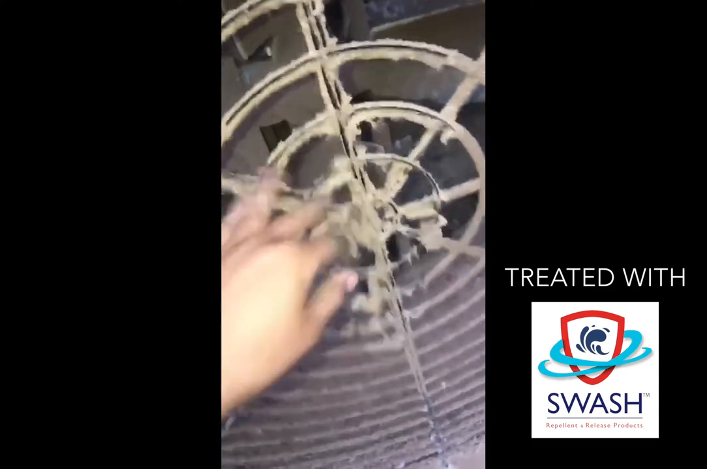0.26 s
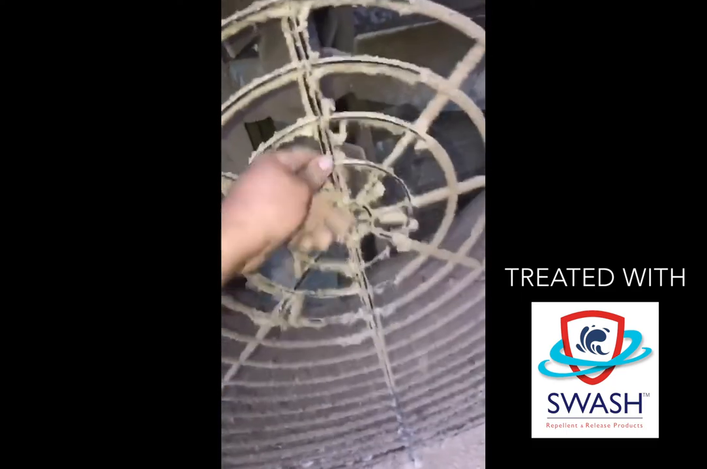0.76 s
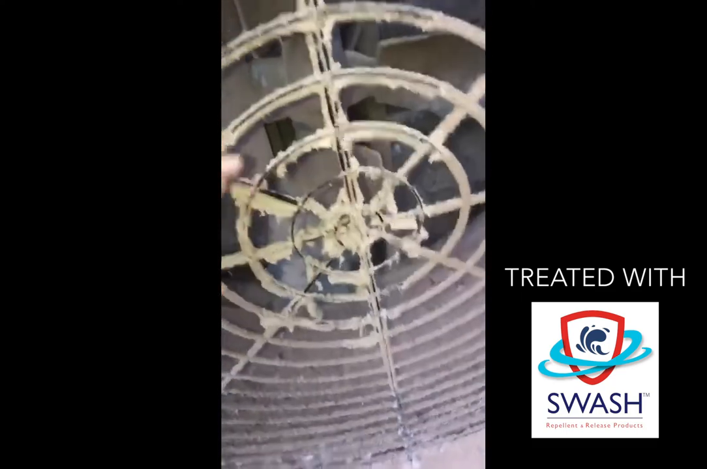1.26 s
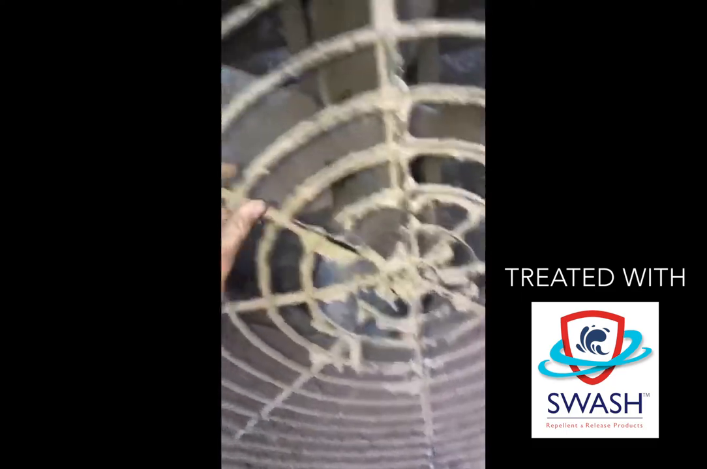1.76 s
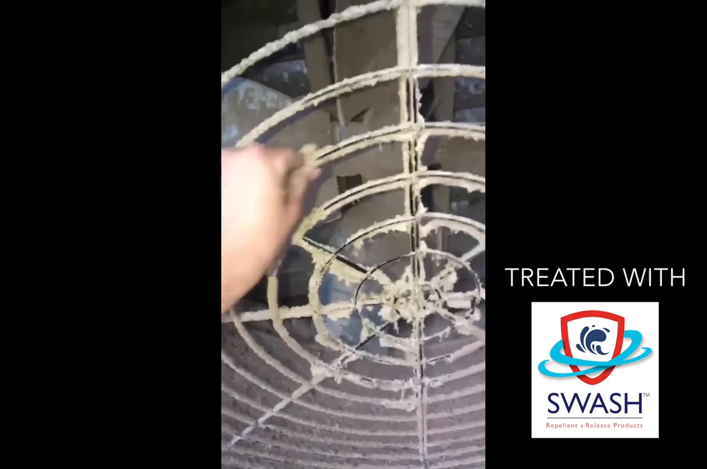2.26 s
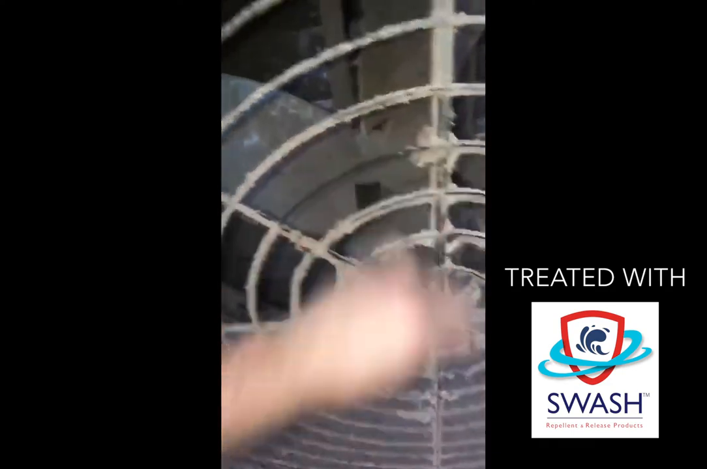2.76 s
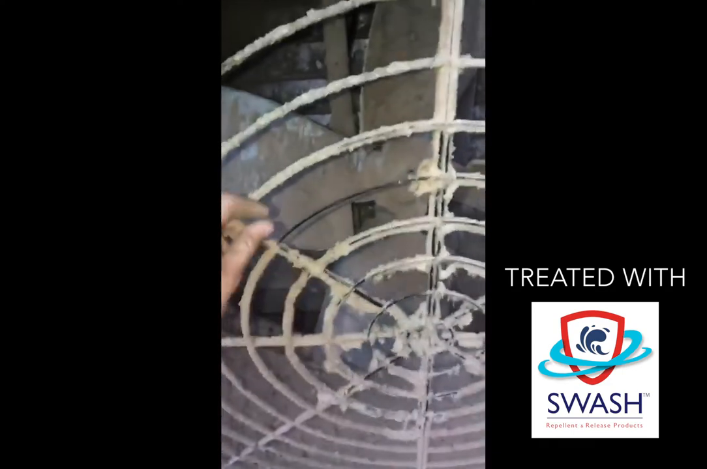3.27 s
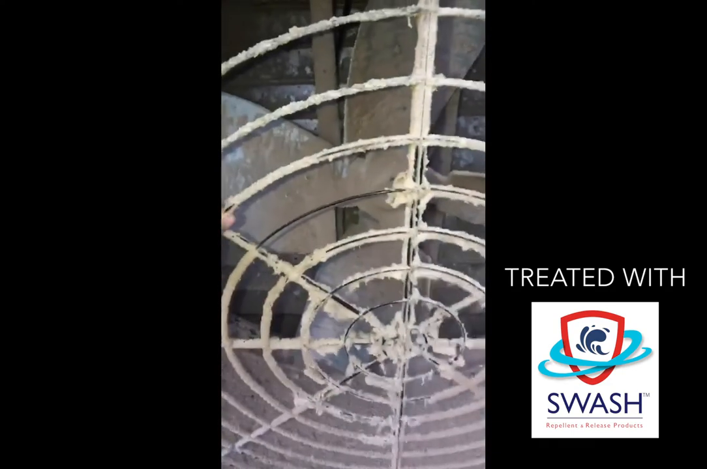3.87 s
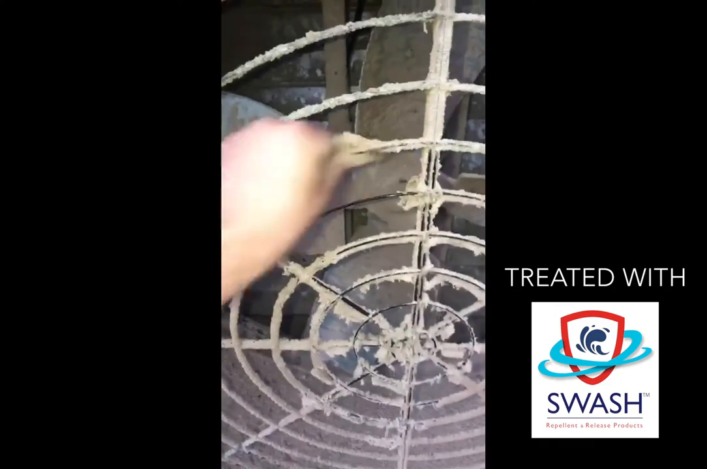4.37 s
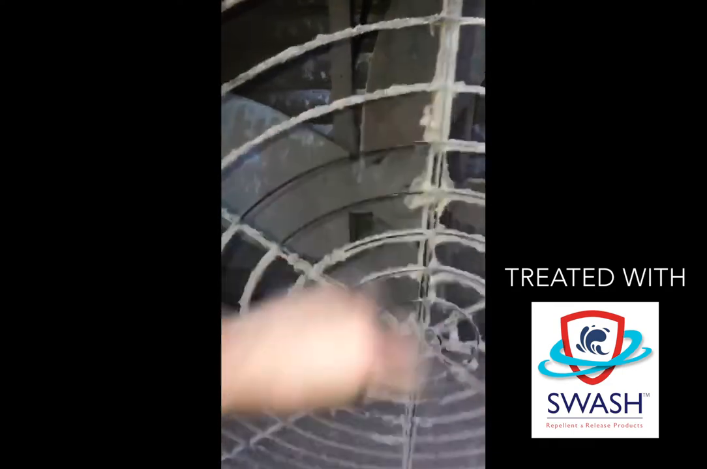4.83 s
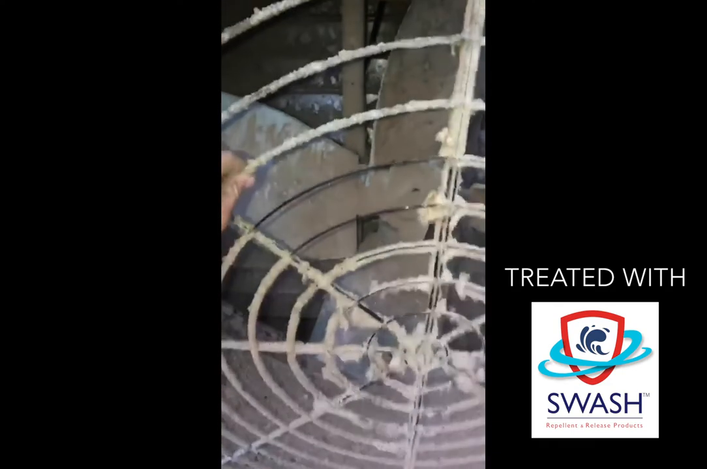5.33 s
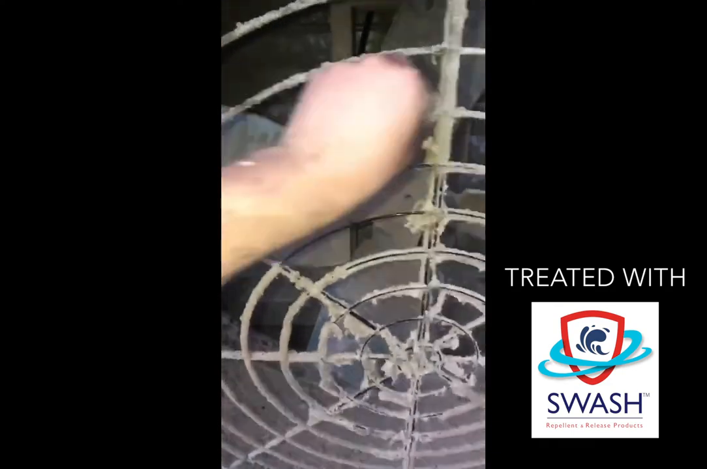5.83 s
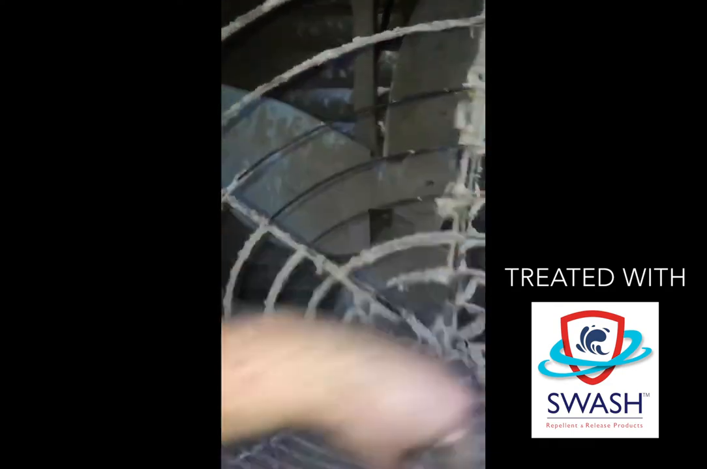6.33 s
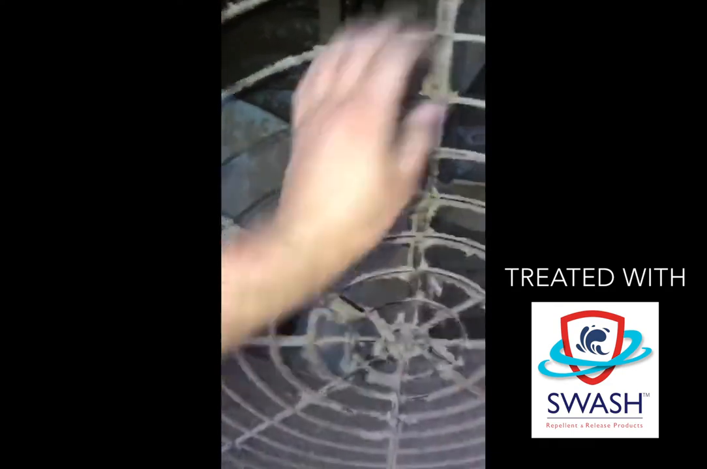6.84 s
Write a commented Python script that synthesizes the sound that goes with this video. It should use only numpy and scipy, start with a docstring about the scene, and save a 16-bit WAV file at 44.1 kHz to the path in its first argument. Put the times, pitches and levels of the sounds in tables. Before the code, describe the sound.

Large exhaust fans rumble and hum steadily in a livestock shed while crickets trill thinly above and a hand rubs gritty dust off a wire guard.

```python
"""In a livestock shed two large exhaust fans run: slowly beating blade harmonics, motor hum and shaped noise for air.
Crickets whine above them in short falling notes with a blurred ring, among a very high hiss and rising squeaks.
A hand rubs caked dust off the wire guard of an idle fan: coloured random grains swell and fade, with one tick.
The sound fades to silence for an instant, and again for good just before the end."""
import sys
import numpy as np
from scipy import signal
from scipy.fft import rfft, irfft, next_fast_len
from scipy.io import wavfile
from scipy.ndimage import uniform_filter1d

SR = 44100
rng = np.random.default_rng(int(sys.argv[2]) if len(sys.argv) > 2 else 0)


def to_wav(s):
    """Save 16-bit WAV."""
    ch = np.atleast_2d(s).T  # columns
    pcm = np.round(np.clip(ch, -1, 1) * 32767)  # PCM
    wavfile.write(sys.argv[1], SR, pcm.astype(np.int16))


N = 313110
TIME = np.arange(N) / SR


def from_db(db):
    """Decibels to amplitude gain."""
    return 10 ** (np.asarray(db) / 20)


def rms_one(x):
    """Scale to unit power."""
    return x / np.sqrt(np.mean(x ** 2) + 1e-20)


def in_time(rows):
    """Draw each column as a curve over time, its points joined by straight lines."""
    seconds, *columns = np.transpose(rows)
    return [np.interp(TIME, seconds, column) for column in columns]


def swells(rows):
    """An envelope of bell-shaped swells, their powers summed; half length is where power falls to 1/e."""
    power = 0
    for middle, half_s, level_db in rows:
        bell = np.exp(-((TIME - middle) / half_s) ** 2)
        power = power + from_db(level_db) ** 2 * bell
    return np.sqrt(power)


def drift(rate):
    """Smoothed random motion with rms 1, low-passed with two equal poles at about rate in Hz."""
    step = 40  # drawn at every 40th sample, then joined by lines
    settle = 2000  # start-up steps thrown away
    pole = np.exp(-2 * np.pi * rate * step / SR)
    steps = rng.standard_normal(N // step + settle + 2)
    slow = signal.lfilter([1], [1, -2 * pole, pole * pole], steps)[settle:]
    return np.interp(np.arange(N) / step, np.arange(len(slow)), rms_one(slow))


def coloured(x, spectrum):
    """Filter by a curve of dB over log frequency, then scale to unit power, so only its shape counts."""
    hz, level_db = np.transpose(spectrum)
    size = next_fast_len(N)
    bins = np.maximum(np.fft.rfftfreq(size, 1 / SR), 1)
    gain = from_db(np.interp(np.log(bins), np.log(hz), level_db, left=-60, right=-60))
    return rms_one(irfft(rfft(x, size) * gain, size)[:N])


def air(spectrum):
    """Turbulent noise of a given colour; unit power."""
    return coloured(rng.standard_normal(N), spectrum)


def narrow_noise(hz, width_hz):
    """Noise ringing in one resonance; unit power."""
    r = np.exp(-np.pi * width_hz / SR)
    poles = [1, -2 * r * np.cos(2 * np.pi * hz / SR), r * r]
    return rms_one(signal.lfilter([1, 0, -1], poles, rng.standard_normal(N)))


def tone(hz):
    """A sine of unit power that follows a pitch curve from a random phase."""
    turns = np.cumsum(hz) / SR + rng.random()
    return np.sqrt(2) * np.sin(2 * np.pi * turns)


def glide(from_hz, to_hz, length_s, bend=1):
    """A short swelling and fading note that slides in pitch, faster towards its end if bend exceeds 1."""
    u = np.linspace(0, 1, int(length_s * SR))
    swell = np.sqrt(np.abs(np.sin(np.pi * u)))
    return swell * tone(from_hz + (to_hz - from_hz) * u ** bend)


def add(track, s, sound):
    """Mix a sound in, centred on a time in seconds."""
    at = max(round(s * SR) - len(sound) // 2, 0)
    track[at:at + len(sound)] += sound[:max(N - at, 0)]


def fan(blade_hz, levels_db, slip, offsets, flutter_db, flutter_rate, in_step_s=1.77):
    """Blades pass the struts, giving harmonics; uneven inflow makes each overtone flutter."""
    # Standing waves colour the hum as the microphone moves. Each row: time in seconds,
    # level change in dB on blade harmonics 1, 2, 3, 4, 5, 6, then on all higher ones.
    standing_waves = [(0.0, 0, 1.5, 4, 0, -1, -4, -1.5), (.35, 0, -2, -12, 0.5, -3, -5.5, -0.5),
                      (.8, 0, 0, 1.5, 4, -14, -1.5, 0), (1.35, -.2, 4, -7, 1.5, -12, -0.5, -4),
                      (1.7, -1, 1.5, 0, -2.5, 0, -1.5, -1.5), (2.2, 0.5, -1, -3.5, -9, -3, 2.5, 0),
                      (2.7, 1, -4.5, 2, 1, 3, 1, 0), (3.2, 0, 3.5, .5, -0.5, 2, 2.5, 0.5),
                      (3.75, -2, -13, 4.5, -4, 4, -7, -2), (4.25, -1, -5, 0.5, -1, -2, 1, -3),
                      (4.5, -1.5, -3.5, -12, -6.5, 0, -13, -3), (4.8, -2, -11, 2.5, -1.5, -1, -7, -2),
                      (5.45, 1, -2, -4, 2, 0, 4, 0.5), (6.0, -4, -10, 3, 2.5, 1, -7, -0.5),
                      (6.3, -3, 3, 4.5, 1.5, -1, 0.5, -2.5), (6.48, -6, -6, 0, -0.5, -3, 4.5, -4),
                      (6.85, -6, 8, -2, 3, -6, 3, -1)]
    standing_db = in_time(standing_waves)
    # at in_step_s the blades of both fans pass together, and again once every beat
    passes = blade_hz * (TIME - in_step_s) + slip
    out = np.zeros(N)
    for k, level_db in enumerate(levels_db):
        place_db = standing_db[min(k, len(standing_db) - 1)]
        flutter = flutter_db * drift(flutter_rate) if k else 0
        harmonic = np.sqrt(2) * np.sin(2 * np.pi * ((k + 1) * passes + offsets[k]))
        out += from_db(level_db + place_db + flutter) * harmonic
    return out


def fans(near_hz=31.85, next_hz=31.48, wander_hz=0.028, mains_hz=120, mains_db=-49):
    """Two like fans on one supply beat at nearly the same speed, over the hum of their motors."""
    # Each row: blade-pass multiple, near fan level in dB, next fan level in dB, before standing waves.
    blade_orders = [(1, -27.5, -42), (2, -42, -68), (3, -40, -66), (4, -46, -48.5), (5, -54.5, -63),
                    (6, -49, -82), (7, -49.5, -55.5), (8, -49.5, -61.5), (9, -55, -74), (10, -60, -65.5),
                    (11, -53, -60.5), (12, -57.5, -60.5), (13, -64, -65), (14, -65, -65)]
    _, near_db, next_db = np.transpose(blade_orders)
    slip = np.cumsum(wander_hz * drift(0.5)) / SR  # shared speed wander, in blade passes
    offsets = rng.random(len(near_db))  # shared phase of each harmonic, in turns
    near = fan(near_hz, near_db, slip, offsets, flutter_db=0.24, flutter_rate=6.7)
    neighbour = fan(next_hz, next_db, slip, offsets, flutter_db=0.5, flutter_rate=0.99)
    motors = from_db(mains_db) * tone(np.full(N, mains_hz))
    return near + neighbour + motors


def reflected(x, sway_s=0.00019, sway_rate=0.73, wall_cut_hz=3500):
    """Near reflections give a hollow ring, which shifts as the hand-held microphone sways."""
    # Reflections off the housing and near walls. Each row: mean delay in seconds, strength as a gain.
    echoes = [(.00212, 0.2), (.00302, .1), (.00685, 0.04), (.00893, 0.31), (.0101, 0.18)]
    dulled = signal.sosfilt(signal.butter(2, wall_cut_hz, fs=SR, output="sos"), x)
    out = x
    for delay, strength in echoes:
        arrival = TIME - delay - sway_s * drift(sway_rate)
        out = out + strength * np.interp(arrival, TIME, dulled)
    return out


def airflow(blade_hz=31.85, chop=0.02, third_chop=0.023, gust_db=0.65, hiss_db=-64,
            duct_hz=1080, duct_width_hz=380, duct_swell_db=0.7, ring_swell_db=2.5):
    """Air rumbles through the housings and rushes over chopping blades; the housing rings by fits."""
    # Colours of the air noise. Each row: frequency in Hz, relative level in dB per Hz.
    rumble_colour = [(16, -16.5), (30, 9.5), (42, 5), (65, 5), (100, 0), (145, 0), (180, -3.5), (215, -3),
                     (270, -2.5), (325, -8.5), (390, -4), (450, -11), (560, -15), (750, -23.5), (1200, -64)]
    rush_colour = [(400, -26), (650, -0.5), (800, -2), (900, -1), (1200, 1), (1500, -3.5), (1900, -4.5),
                   (2300, -9), (2700, -13), (3600, -13.5), (4000, -15), (4800, -21.5), (8000, -46)]
    hiss_colour = [(2500, 4.5), (3700, 5), (4200, -8), (5000, 7), (5800, 10), (6300, 13), (7200, 10.5),
                   (7700, 11.5), (8800, 10), (9500, 1), (10300, -46), (12500, -42)]
    # Each row: time in seconds, rumble level in dB before its drift.
    rumble_level = [(0.1, -38), (1.0, -37), (2.0, -37), (3.2, -37), (4.3, -36), (5.6, -38), (6.3, -37.5),
                    (6.9, -37.5)]
    # Off the duct's axis its ring fades and the plain rush gains. Each row: time in seconds,
    # rush in dB and duct ring in dB before reflections, change of the housing's ring in dB.
    air_path = [(.1, -60, -55, 1), (.7, -57, -55.5, 2), (1.4, -55.5, -58, 0.5), (2.4, -53, -73, 0),
                (3.3, -54.5, -60, -0.5), (4.1, -54, -68, -.5), (5.0, -54.5, -79.5, -2),
                (6.9, -53.5, -76, -2)]
    # Ringing of the fan housing. Each row: frequency in Hz, width in Hz, rms in dB before that change.
    housing_modes = [(501.3, 23, -62), (613, 28, -68.5), (881, 13, -68.5), (993, 40, -67.5),
                     (1040, 12, -68.5), (1343, 55, -77), (1447, 19, -69), (1700, 47, -74.5),
                     (1980, 45, -76)]
    rumble_db, = in_time(rumble_level)
    rush_db, duct_db, housing_db = in_time(air_path)
    once_a_pass = chop * tone(np.full(N, blade_hz))
    thrice_a_pass = third_chop * tone(np.full(N, 3 * blade_hz))
    chopped = 1 + once_a_pass + thrice_a_pass
    rumble = from_db(rumble_db + 0.97 * drift(6.1)) * air(rumble_colour)
    rush = from_db(rush_db + gust_db * drift(25)) * air(rush_colour)
    duct_gain = from_db(duct_db + duct_swell_db * drift(8.9))
    duct = duct_gain * narrow_noise(duct_hz, duct_width_hz)
    housing = np.zeros(N)
    for hz, width_hz, level_db in housing_modes:
        ring_db = level_db + housing_db + ring_swell_db * drift(2.5)
        housing += from_db(ring_db) * narrow_noise(hz, width_hz)
    hiss = from_db(hiss_db + 0.5 * drift(6.9)) * air(hiss_colour)
    return (rumble + housing) * chopped + reflected((rush + duct) * chopped + hiss)


def buffets():
    """Stirred air thumps softly on the microphone: swells of low noise."""
    # Each row: middle in seconds, half length in seconds, level in dB.
    thumps = [(.06, .07, -41.5), (6.53, .012, -35), (6.66, .02, -37), (6.83, .13, -41.5)]
    # Each row: frequency in Hz, relative level in dB per Hz.
    thump_colour = [(25, -6), (50, 17), (85, 16), (160, -13)]
    return swells(thumps) * air(thump_colour)


def high_cricket(top_hz=8480, bottom_hz=8000, stroke_s=0.007, period_s=0.0125, count=5,
                 blur_db=-5, ring_hz=8250, ring_width_hz=260):
    """A small cricket buzzes in handfuls of quick, uneven wing strokes, in a blur of their own ring."""
    # Each row: middle in seconds, mean stroke level in dB.
    buzzes = [(0.021, -67), (.23, -63), (.47, -66), (.71, -61.5), (.985, -59), (1.24, -62), (1.53, -61),
              (1.781, -67.5), (2.029, -70), (2.27, -66), (2.52, -68), (2.749, -63), (2.99, -64),
              (3.46, -69), (3.72, -67), (3.95, -68), (4.5, -61), (5.0, -60), (5.78, -62), (6.01, -62),
              (6.075, -63), (6.321, -59.5), (6.56, -59.5), (6.82, -67)]
    stroke_times = period_s * (np.arange(count) - (count - 1) / 2)
    out = np.zeros(N)
    for middle, buzz_db in buzzes:
        for s in middle + stroke_times:
            pitch = 1 + 0.008 * rng.standard_normal()
            note = glide(top_hz * pitch, bottom_hz * pitch, stroke_s)
            add(out, s + rng.normal(0, 0.00092), from_db(buzz_db + rng.normal(0, 1.2)) * note)
    lingering = np.sqrt(np.abs(uniform_filter1d(out ** 2, size=900)))  # level over about 20 ms
    return out + from_db(blur_db) * lingering * narrow_noise(ring_hz, ring_width_hz)


def near_cricket(top_hz=4740, bottom_hz=4190, stroke_s=0.0135, ring_s=0.0066, direct_db=-1, blur_gain_db=2):
    """Each wing stroke of a chirp gives one falling note, and a blurred ring dies away after it."""
    # Each row: first stroke in seconds, number of wing strokes, stroke period in seconds,
    # mean stroke level in dB before direct_db.
    chirps = [(0.023, 3, 0.016, -62.5), (0.086, 3, 0.016, -63), (0.146, 3, 0.016, -64),
              (0.221, 2, 0.017, -62), (0.267, 3, 0.016, -64), (0.328, 3, 0.0165, -61),
              (0.39, 3, 0.0165, -62), (0.451, 4, 0.0165, -61.5), (0.53, 7, 0.016, -60.5),
              (0.654, 3, 0.016, -60.0), (0.715, 3, 0.016, -60.5), (0.779, 7, 0.017, -58.5),
              (0.913, 3, 0.016, -58), (0.979, 5, 0.016, -58), (1.064, 6, 0.017, -57.5),
              (1.181, 3, 0.017, -58), (1.25, 3, 0.017, -57), (1.305, 4, 0.018, -57.5),
              (1.388, 3, 0.0165, -57.5), (1.452, 6, 0.017, -58.5), (1.568, 3, 0.0165, -57),
              (1.634, 3, 0.0165, -58), (1.696, 3, 0.0165, -58), (1.761, 3, 0.016, -58),
              (1.824, 6, 0.017, -60.5), (1.939, 3, 0.017, -62.0), (2.002, 5, 0.017, -62.5),
              (2.098, 3, 0.016, -62), (2.16, 3, 0.0165, -61), (2.226, 4, 0.018, -60.5),
              (2.315, 4, 0.017, -61.0), (2.385, 1, 0.017, -65), (2.414, 4, 0.018, -62),
              (2.502, 4, 0.018, -59.0), (2.582, 3, 0.0165, -60), (2.646, 4, 0.0165, -61),
              (2.723, 3, 0.0165, -60.5), (2.786, 3, 0.0165, -59.5), (2.849, 3, 0.0165, -58.5),
              (2.913, 3, 0.016, -58.5), (2.974, 3, 0.017, -58.5), (3.042, 4, 0.0165, -60),
              (3.121, 3, 0.016, -59), (3.174, 4, 0.016, -60), (3.243, 2, 0.016, -61.0),
              (3.309, 3, 0.017, -60), (3.545, 4, 0.0185, -64.5), (3.649, 2, 0.0175, -63.5),
              (3.927, 2, 0.018, -64), (3.961, 1, 0.014, -65), (3.992, 3, 0.0175, -64),
              (4.057, 3, 0.016, -65), (4.112, 1, 0.017, -66), (4.135, 5, 0.017, -64),
              (4.231, 4, 0.0165, -65), (4.31, 3, 0.016, -64), (4.37, 7, 0.0165, -61.5),
              (4.5, 3, 0.016, -59), (4.564, 6, 0.017, -59.5), (4.677, 3, 0.016, -60.5),
              (4.738, 7, 0.016, -60.5), (4.861, 3, 0.0165, -60.0), (4.924, 5, 0.0175, -60.5),
              (5.022, 4, 0.0165, -58.5), (5.101, 3, 0.016, -60.5), (5.163, 3, 0.016, -61),
              (5.225, 3, 0.016, -62.5), (5.29, 3, 0.0165, -61), (5.353, 4, 0.016, -60),
              (5.422, 5, 0.0165, -61.0), (5.519, 3, 0.0165, -62), (5.582, 3, 0.016, -62),
              (5.645, 3, 0.016, -59), (5.705, 3, 0.016, -60.0), (5.773, 4, 0.016, -59),
              (5.842, 3, 0.017, -58.5), (5.907, 3, 0.016, -59), (5.969, 2, 0.016, -58),
              (6.007, 2, 0.018, -55), (6.086, 3, 0.0165, -57.5), (6.148, 4, 0.0165, -57),
              (6.222, 3, 0.0165, -57), (6.287, 5, 0.017, -58), (6.388, 3, 0.016, -57),
              (6.453, 3, 0.018, -58), (6.64, 3, 0.019, -60), (6.7, 1, 0.017, -65), (6.728, 2, 0.018, -59.5),
              (6.767, 2, 0.018, -61.5), (6.811, 4, 0.017, -66), (6.89, 6, 0.018, -68)]
    # Each row: time in seconds, blurred ring in dB relative to the strokes, before blur_gain_db.
    song_blur = [(.3, -2), (1.3, -11), (1.7, -7), (2.5, -1), (2.9, -9), (3.3, -5), (3.6, 0), (4.1, 1),
                 (4.6, -5.5), (5.4, -4), (6.4, -13), (6.8, 2)]
    # Colour of that ring. Each row: frequency in Hz, relative level in dB per Hz.
    song_colour = [(4050, -30), (4250, -9), (4450, -4.5), (4610, 3), (4730, -6), (4880, -29)]
    out = np.zeros(N)
    for start, count, period_s, chirp_db in chirps:
        for s in start + period_s * np.arange(round(count)):
            pitch = 1 + 0.0059 * rng.standard_normal()
            note = glide(top_hz * pitch, bottom_hz * pitch, stroke_s, bend=1.4)
            add(out, s, from_db(chirp_db + rng.normal(0, 0.5)) * note)
    keep = np.exp(-1 / (ring_s * SR))  # power decays by 1/e in ring_s
    lingering = np.sqrt(signal.lfilter([1 - keep], [1, -keep], out ** 2 + 1e-18))
    blur_db, = in_time(song_blur)
    blur = from_db(blur_db + blur_gain_db) * lingering * air(song_colour)
    return from_db(direct_db) * out + blur


def flake(snap_s=0.089, level_db=-50, t60_s=0.029):
    """One flake of crust snaps off with a tiny tick: bright noise that starts at once and decays."""
    age = TIME - snap_s
    decay = from_db(level_db - 60 * np.clip(age / t60_s, 0, 2)) * (age > 0)
    return decay * air([(4000, -22.5), (5500, 15), (10500, 9), (12000, -28)])


def rubbing(grains_per_s=6000, spread_db=2.0, fine_db=-17):
    """Rubs crumble the crust into a stream of grains; hard rubs add a finer, brighter powder."""
    # Dust rubbed off the guard. Each row: middle in seconds, half length in seconds,
    # level in dB before drift and powder.
    rubs = [(.26, 0.15, -60.5), (.51, 0.092, -61), (2.27, 0.045, -66), (2.51, 0.09, -61),
            (4.03, 0.024, -65), (4.3, 0.1, -63), (4.56, 0.13, -57), (4.69, 0.037, -57),
            (4.78, 0.077, -54.5), (5.57, 0.18, -63.5), (5.901, 0.23, -63), (6.65, 0.025, -59),
            (6.86, 0.25, -64)]
    # Colour of crumbling dust. Each row: frequency in Hz, relative level in dB per Hz.
    dust_colour = [(2000, -47), (3500, 1.5), (5000, -3), (6000, 1), (6800, 8), (7600, 2.5), (8800, 1),
                   (9600, -3), (10400, -38), (12000, -34.5), (13000, -52)]
    powder_colour = [(9000, -13), (10200, -5), (11600, 1), (12600, -5.5)]
    pressure = swells(rubs)
    sizes = from_db(spread_db * np.minimum(rng.exponential(1, N), 4)) * rng.choice([-1, 1], N)
    grains = sizes * (rng.random(N) < grains_per_s / SR)
    hardness = pressure / pressure.max()
    powder = from_db(fine_db) * hardness * coloured(grains, powder_colour)
    return pressure * from_db(1.0 * drift(14)) * (coloured(grains, dust_colour) + powder)


def whistle(hz=3330, width_hz=25):
    """A faint whistle comes and goes during the rubs: noise in one narrow resonance."""
    # Each row: middle in seconds, half length in seconds, level in dB.
    whistles = [(.335, 0.06, -66), (.48, .06, -70), (.6, 0.032, -72)]
    return swells(whistles) * narrow_noise(hz, width_hz)


def high_hiss(edge_s=0.08, flutter_db=2):
    """A very high faint hiss comes and goes for about a second: fluttering noise."""
    # Each row: start in seconds, end in seconds, level in dB before flutter.
    hiss_stretches = [(.9, 1.78, -81.5), (2.874, 3.72, -76), (5.28, 6.27, -75)]
    # Each row: frequency in Hz, relative level in dB per Hz.
    high_hiss_colour = [(10700, -34), (11150, 15), (11800, 7), (12500, -6)]
    level = np.zeros(N)
    for start, end, stretch_db in hiss_stretches:
        inside_s = np.minimum(TIME - start, end - TIME)
        level += from_db(stretch_db) * np.clip(inside_s / edge_s + 0.5, 0, 1)
    return level * from_db(flutter_db * drift(20)) * air(high_hiss_colour)


def shed(x, t60_s):
    """Scattered reflections from the walls: decaying noise of unit energy, convolved with the sound."""
    t = TIME[:SR // 2]
    tail = rng.standard_normal(len(t)) * from_db(-60 * t / t60_s)
    return signal.fftconvolve(x, tail / np.sqrt(np.sum(tail ** 2)))[:N]


def squeaks(roughness_rate=260, room_db=-9):
    """Small notes slide upward, roughened by fast random modulation, with reflections from the shed."""
    # Each row: middle in seconds, level in dB before roughening, start in Hz, end in Hz, length in seconds.
    squeak_notes = [(0.96, -52.5, 6400, 7500, 0.024), (3.037, -55, 6700, 7400, 0.038),
                    (3.887, -58.5, 6500, 7400, 0.031), (5.617, -59, 6300, 7600, 0.028)]
    out = np.zeros(N)
    for s, level_db, from_hz, to_hz, length_s in squeak_notes:
        add(out, s, from_db(level_db) * glide(from_hz, to_hz, length_s))
    out = out * drift(roughness_rate)
    return out + from_db(room_db) * shed(out, t60_s=0.2)


def scene():
    """Everything heard from just in front of the guard."""
    machines = fans() + airflow() + buffets()
    crickets = high_cricket() + near_cricket()
    hand = flake() + rubbing()
    return (machines + crickets + hand + whistle() + high_hiss() + squeaks())[None]


def record(dry, cutoff_hz=12600):
    """Twice the sound fades quickly to silence, and a steep low-pass cuts the top."""
    # Each row: start of silence in seconds, its end in seconds, length of the fade before it in seconds.
    silences = [(6.037, 6.064, .045), (6.995, 7.2, .012)]
    live = np.ones(N)
    for start, end, fade_s in silences:
        fade = np.sqrt(np.clip((start - TIME) / fade_s, 0, 1))
        live = live * np.where(TIME < end, fade, 1)
    gated = dry * uniform_filter1d(live, size=30)  # softened edges
    return signal.sosfilt(signal.ellip(10, 0.1, 80, cutoff_hz, fs=SR, output="sos"), gated)


dry = scene()
out = record(dry)
to_wav(out)
```